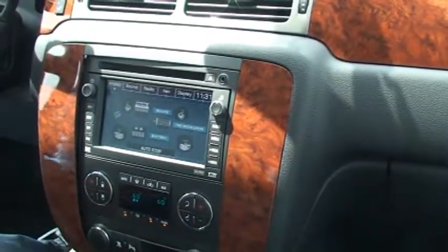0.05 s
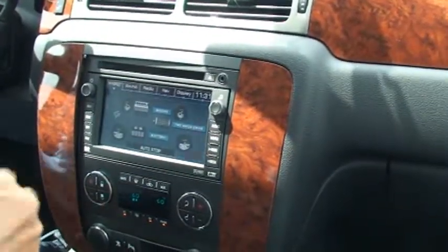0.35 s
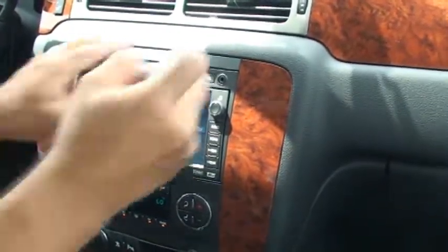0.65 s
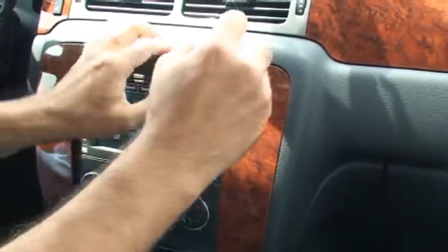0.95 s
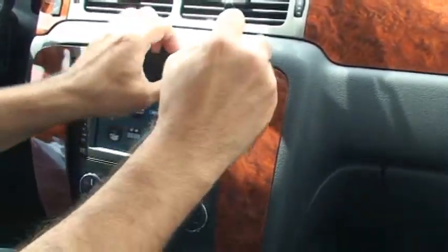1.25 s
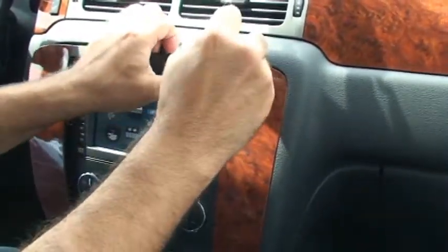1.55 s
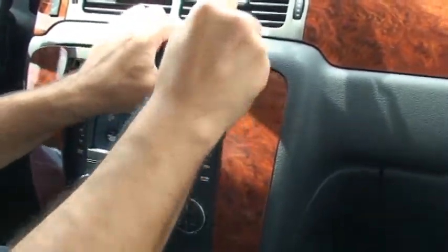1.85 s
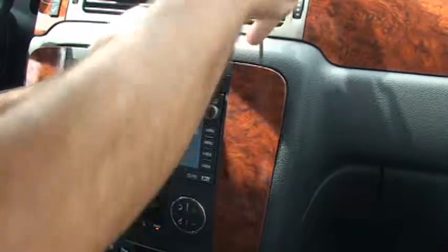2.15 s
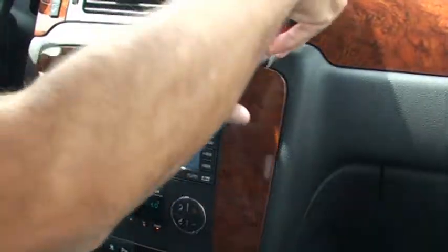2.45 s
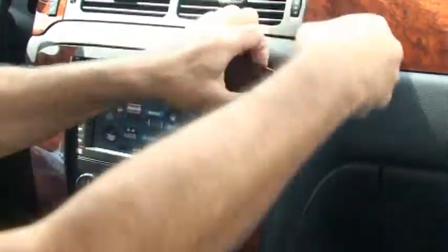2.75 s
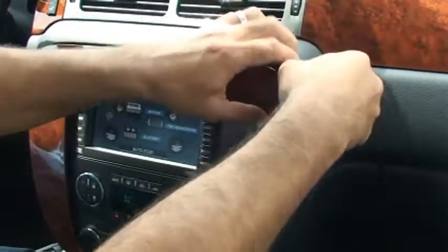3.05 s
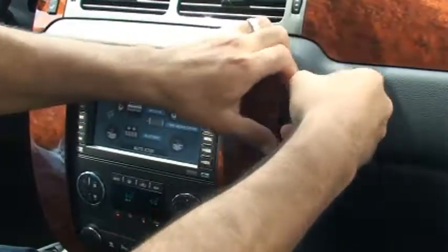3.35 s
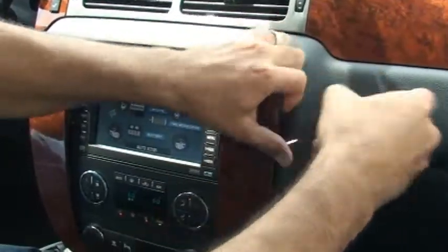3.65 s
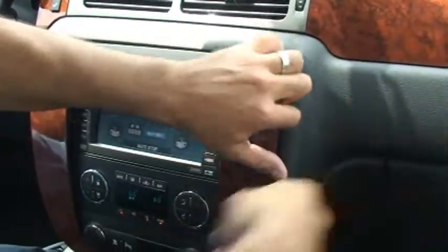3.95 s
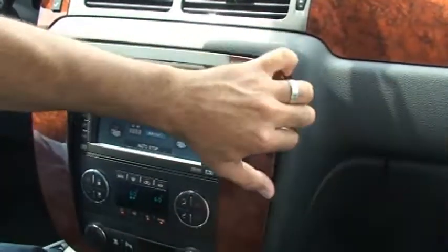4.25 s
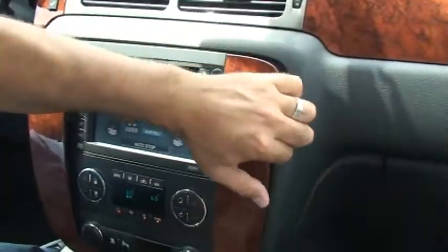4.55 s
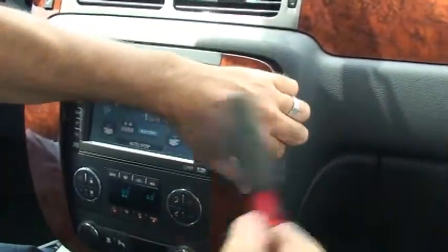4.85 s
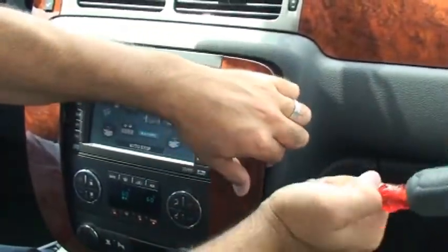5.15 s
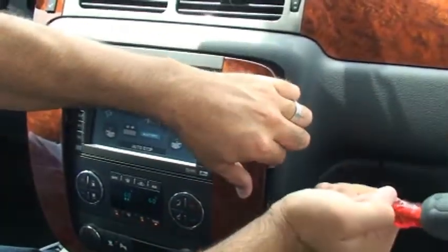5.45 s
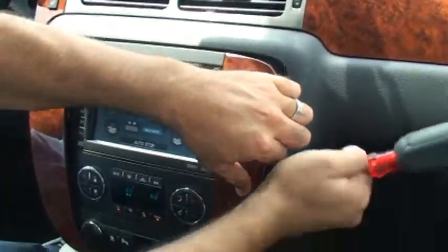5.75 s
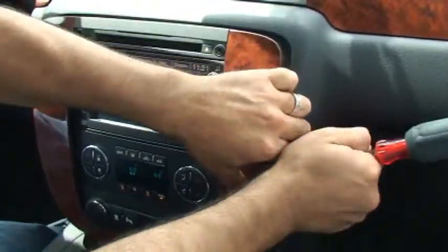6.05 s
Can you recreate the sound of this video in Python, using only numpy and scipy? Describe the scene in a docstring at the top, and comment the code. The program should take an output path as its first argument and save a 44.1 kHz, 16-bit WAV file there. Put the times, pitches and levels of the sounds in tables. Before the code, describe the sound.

Inside a small car cabin with little echo, air vents hum and hiss while a hand swishes over plastic trim. A screwdriver blade ticks in a gap and the first clips snap, knocking the dashboard frame. A flurry of snaps and hollow thumps follows, then the steel shaft slips free with a brief ring. A few more snaps give way to light ticks and rubbing, all heard close.

```python
"""A plastic dashboard frame is prised off with a screwdriver in a small car cabin with little echo.
From the start the vents hum and hiss, and a hand swishes over the trim. The blade ticks in the gap, the
plastic creaks and the steel tip pings. Just after 1 s the first fasteners snap: the frame knocks and
judders, and the hollow dashboard thumps. A flurry of snaps comes around 3 s, then the shaft slips free
and rings. More snaps follow near 4.6 s, and the scene ends mostly in light ticks and rubbing."""
import sys
import numpy as np
from scipy import signal
from scipy.fft import rfft, irfft, next_fast_len
from scipy.io import wavfile
from scipy.ndimage import map_coordinates

SR = 44100
rng = np.random.default_rng(int(sys.argv[2]) if len(sys.argv) > 2 else 0)


def dump_mix(stems):
    """Bounce the given channels to the path in sys.argv[1] as a 16-bit WAV at rate SR."""
    frames = np.atleast_2d(stems).T  # one column per channel
    limited = np.clip(frames, -1, 1)  # hard clip at full scale
    pcm = np.round(limited * 32767).astype(np.int16)
    wavfile.write(sys.argv[1], SR, pcm)


N = 277389
AGE = np.arange(SR // 6) / SR  # seconds since a blow

# Levels are relative. A t60 is the time a sound takes to fade by 60 dB.
# tone colours, from bass to treble (f/Hz, level/dB)
RUMBLE_TONE = [(12, -13), (26, 1.5), (33, -15), (46, -0.5), (62, -9), (82, -6.5), (112, 2), (132, -11),
               (180, -8), (250, -18.5), (340, -18.5), (600, -29.5), (1500, -90)]  # dashboard and cabin rumbling
VENT_TONE = [(150, -3), (250, -39), (450, -15.5), (800, -14), (1400, -13.5), (3000, -37), (6000, -24.5),
             (10000, -25.5), (15500, -32)]  # air leaving the vents
SKIN_TONE = [(1500, 7), (4000, 0.5), (7000, -1), (10000, -11), (13000, -8.5), (15500, -20)]  # skin on plastic
CREAK_TONE = [(150, -12), (300, 1.5), (450, -1), (800, 0), (1300, -9), (2000, -11), (5000, -20.5),
              (9000, -61)]  # strained plastic, also air in the ducts
RUB_TONE = [(1000, 10.5), (2000, 5), (3500, -6), (6300, -0.5), (10000, -11.5), (13000, -7), (15500, -35)]  # plastic rubbing, also the cabin's hiss
CRACK_TONE = [(1200, 16), (2300, 4.5), (3500, 4.5), (6300, -4), (9400, -16), (13000, -19.5), (15500, -45)]  # a contact breaking
# how alike a noise is on the left and right (f/Hz, likeness where 1 is the same)
EAR_LIKENESS = [(25, 1), (60, 0.89), (130, 0.9), (290, 0.05), (640, 0.019), (1400, 0.089), (3100, 0.36),
                (7000, 0.44), (13000, 0.79)]
# how much louder a noise is on the left (f/Hz, left minus right/dB)
EAR_BALANCE = [(30, -11), (60, 7), (110, -2.5), (200, -3.5), (700, -4.5), (1300, -2.5), (4400, 0)]
# the fan's steady notes (f/Hz, level/dB)
FAN_NOTES = [(99, -49.5), (231.5, -49), (274.5, -49.5), (317.6, -54.5)]
# a hand slides; a lighter glide sounds thinner (middle t/s, width/s, level/dB, extra treble/dB)
HAND_SLIDES = [(.01, 0.17, -46.5, 8.5), (0.428, 0.1, -47, 6.5), (.63, 0.023, -45.5, 7),
               (.84, 0.17, -48.5, 4), (1.115, .025, -44.5, 5), (1.35, 0.054, -48, 1),
               (1.6, 0.056, -53.5, -1), (1.96, .06, -62, 15), (2.22, 0.36, -52, -3),
               (2.53, 0.018, -41.5, 9), (2.72, .06, -48, 8), (3.29, 0.026, -42, 5), (3.52, 0.09, -47, -2),
               (4.15, 0.07, -49.5, 6), (4.9, 0.18, -56, 3), (5.245, 0.035, -46.5, 8.5),
               (5.33, 0.024, -47, 7.5), (5.99, 0.083, -47.5, 8), (6.2, 0.054, -45.5, 6)]
# the arms put weight on the dashboard (middle t/s, width/s, level/dB)
ARM_LEANS = [(.02, 0.11, -36.5), (1.03, 0.056, -32.5), (2.48, 0.092, -27.5), (3.33, 0.053, -31),
             (3.9, 0.23, -37), (4.68, 0.1, -35), (6.16, 0.16, -36.5)]
# the frame is levered and grinds in its seat (middle t/s, width/s, level/dB)
LEVER_STRAINS = [(.76, 0.067, -46), (.95, 0.097, -45.5), (1.3, 0.15, -43), (1.98, 0.076, -47),
                 (2.59, 0.057, -33.5), (2.8, 0.081, -38.5), (3.23, 0.078, -35.5), (3.68, 0.024, -26),
                 (4.05, 0.24, -49.5), (4.73, 0.15, -49), (5.93, 0.044, -40.5), (6.27, 0.053, -41)]
# light touches of the blade and fingernails (t/s, level/dB, f/Hz)
LIGHT_TOUCHES = [(0.243, -41, 9100), (0.722, -42, 2330), (0.805, -43.5, 2300), (0.9628, -24.5, 3510),
                 (1.135, -23.5, 12100), (1.3804, -37, 4930), (1.5593, -37.5, 5740), (1.6233, -35, 2690),
                 (1.6901, -39, 2110), (2.053, -35, 3100), (2.077, -35.5, 4900), (2.1958, -26, 7280),
                 (2.274, -36, 2620), (2.361, -14, 8950), (2.5055, -28, 2820), (3.658, -8.5, 6170),
                 (4.0947, -36, 3030), (4.7947, -30.5, 6100), (4.9886, -36.5, 6050), (5.5053, -40, 2740),
                 (5.543, -32.5, 2680), (5.5779, -25, 6580), (5.5917, -27.5, 4740), (5.621, -29.5, 4850),
                 (5.829, -33.5, 5250), (5.8969, -25, 5560), (5.9793, -28.5, 8800), (5.995, -32, 8900),
                 (6.013, -32, 7000), (6.123, -28, 6160), (6.1836, -34, 2450), (6.2317, -27, 3310),
                 (6.255, -28, 2700)]
# the steel tip glances off an edge (t/s, level/dB, f/Hz, t60/s)
TIP_GLANCES = [(.964, -29.5, 3700, 0.057), (4.797, -51, 6150, 0.088)]
# the notes within one ping (multiple of its pitch, level/dB)
PING_NOTES = [(1, 4.5), (0.87, -17), (1.3, -6)]
# fasteners and frame edges let go; hardness and push set the crack and thump against the knock
# (t/s, level/dB, knock f/Hz, hardness/dB, push/dB)
RELEASES = [(1.136, -16, 800, -12.5, -17), (1.275, -33, 795, -13, -16), (1.456, -16, 890, -18.5, -15),
            (2.362, -22.5, 770, -1, -3), (2.372, -16.5, 460, -10.5, -2), (2.811, -27.5, 810, -18.5, -28),
            (2.83, -20, 650, -12.5, -23), (2.839, -14.5, 980, -10.5, -11), (2.862, -13, 836, -8.5, -14.5),
            (2.882, -15.5, 375, -6, -12), (2.921, -17.5, 734, -12.5, -10), (2.936, -20, 380, -13.5, -11),
            (3.012, -17, 683, -9.5, -16), (3.029, -15, 710, -10.5, -28), (3.04, -15.5, 1190, -11.5, -15),
            (3.073, -15.5, 805, -12.5, -27), (3.087, -23.5, 810, -11, -8), (3.14, -17.5, 594, -16.5, -19),
            (3.157, -25, 1320, -6.5, -11), (3.189, -26.5, 446, -11.5, -1.5), (3.225, -28, 1430, -10, -16),
            (3.249, -31.5, 1720, -1.5, -3), (3.282, -32, 1800, -2, -20), (3.318, -30.5, 1090, -14.5, 3.5),
            (3.436, -21, 610, -4.5, -5.5), (3.558, -32.5, 600, -6, -3.5), (3.571, -30.5, 615, -6, 0.5),
            (3.626, -26, 1460, -3, -5.5), (3.658, -30.5, 790, 3, 0), (3.717, -19.5, 1000, -1, -3),
            (3.738, -24, 1590, 1, 0), (3.87, -20.5, 1100, -9, -35), (3.948, -24.5, 1120, -5, -21),
            (4.071, -34.5, 1430, -6, -19), (4.331, -36, 1440, 1.5, -4), (4.494, -28, 468, -9, 7.5),
            (4.614, -30.5, 503, -19.5, -8), (4.641, -17, 420, -9.5, 2.5), (4.666, -23, 680, -12, -3),
            (4.755, -24, 605, -15, -11), (4.764, -28, 650, -12, -15), (4.774, -29.5, 1540, -12, -24),
            (5.447, -28, 1400, -3, -12), (5.843, -27.5, 1080, -14, -21), (6.029, -27.5, 1450, -6, -4)]
# modes, the notes a part rings at when struck; wider ones die sooner (f/Hz, width/Hz, level/dB)
FRAME_MODES = [(385.4, 18.5, 9), (435, 20, 5.5), (512, 10, 1.5), (634.5, 31, 5.5), (710.4, 11, 6),
               (801, 40, 10.5), (974, 31, -0.5), (1095, 37, 6.5), (1254, 28, 6), (1388, 27, 7),
               (1466, 56, 7.5), (1690, 56, 4)]  # the plastic frame
DASHBOARD_MODES = [(83, 12, -7), (108.7, 14.3, -2.5), (158, 130, -11), (180.6, 30, -5), (237, 22, 0)]  # the hollow dashboard
SOCKET_MODES = [(2173, 16, 9.5), (2334, 43, 8.5), (2560, 32, 5.5), (2755, 20, 4.5), (3090, 73, -5.5),
                (3440, 29, -17), (3790, 18, 5)]  # the sockets that hold the fasteners
# the frame moves along its seat in quick slips (start t/s, length/s, level/dB, f/Hz)
SLIP_RUNS = [(1.148, .03, -27.5, 477), (1.199, .042, -36, 755), (2.556, .08, -40.5, 980),
             (3.018, .04, -28, 1060), (3.693, .025, -40.5, 880), (4.489, .006, -27.5, 540),
             (4.649, .008, -22, 450), (4.688, .014, -37.5, 495), (4.741, .028, -32.5, 580),
             (5.859, .05, -37, 710), (6.227, .052, -37.5, 1490)]
# the blade springs or is dragged out of the gap (t/s, level/dB, rise/s)
BLADE_EXITS = [(3.735, -40, .002), (3.777, -26, 0.019), (3.948, -31.5, 0.0017)]
# the notes of the screwdriver's shaft (f/Hz, level/dB, t60/s)
SHAFT_NOTES = [(2277, 2, 0.19), (3520, -11, 0.054), (4560, -12, 0.12)]


def amp(db):
    """Turn decibels into a number to multiply by."""
    return 10 ** (np.asarray(db) / 20)


def unit(x):
    """Scale a sound to an average strength (rms) of 1."""
    return x / np.sqrt(np.mean(x ** 2) + 1e-20)


def punch(x):
    """Scale a blow to an average strength of 1 over its first 30 ms."""
    return x / np.sqrt(np.mean(x[..., :round(.03 * SR)] ** 2) + 1e-20)


def along(points, hz):
    """Read between (f/Hz, value) points on a log frequency scale."""
    freqs, values = np.transpose(points)
    return np.interp(np.log(hz + 1), np.log(freqs + 1), values)


def sides(pan_db):
    """Left and right gains, with the left louder by pan_db."""
    gains = amp(np.array([pan_db, -pan_db]).reshape(2, -1) / 2)
    return gains / np.sqrt(np.mean(gains ** 2, axis=0))


def wobble(rate):
    """A smooth curve through `rate` random values a second."""
    return map_coordinates(rng.standard_normal(int(N * rate / SR) + 4), [np.arange(N) * rate / SR])


def fade(t60):
    """The dying away after a blow."""
    return np.exp(-np.log(1000) * AGE / t60)


def swells(rows):
    """The loudness of movements that speed up and slow down again."""
    t = np.arange(N) / SR
    return np.sqrt(sum(amp(db) ** 2 * np.exp(-((t - s) / width) ** 2) for s, width, db in rows))


def add(track, s, sound):
    """Mix a stereo sound in at s seconds."""
    start = round(s * SR)
    track[:, start:start + sound.shape[1]] += sound[:, :N - start]


def band(x, lo_hz, hi_hz, order=3):
    """Keep the part of a sound between two frequencies."""
    return signal.sosfilt(signal.butter(order, [lo_hz, hi_hz], 'band', fs=SR, output='sos'), x)


def colour(x, points, size=1024):
    """Shape a sound's tone to follow (f/Hz, level/dB) points."""
    gain = amp(along(points, np.fft.rfftfreq(size, 1 / SR)))
    cepstrum = irfft(np.log(gain + 1e-6))
    cepstrum[1:size // 2] *= 2  # folded forward, so nothing rings before the blow
    cepstrum[size // 2 + 1:] = 0
    response = irfft(np.exp(rfft(cepstrum)))
    return signal.fftconvolve(x, response[None], axes=1)[:, :x.shape[1]]


def rush(tone, grain_db=0, grain_rate=200):
    """Stereo noise with a given tone colour; uneven friction can make it grainy."""
    size = next_fast_len(N + SR // 4)
    hz = np.fft.rfftfreq(size, 1 / SR)
    spread = np.arccos(along(EAR_LIKENESS, hz)) / 2
    noise = rng.standard_normal((2, N)) * amp(grain_db * wobble(grain_rate))
    mid, side = rfft(noise, size) * amp(along(tone, hz)) * [np.cos(spread), np.sin(spread)]
    left_right = np.array([mid + side, mid - side]) * sides(along(EAR_BALANCE, hz))
    return unit(irfft(left_right, size)[:, :N])


def burst(t60, tail_db, tail_t60, width, spiky, attack_s=0.0015):
    """A contact breaks in a spray of tiny clicks; the cabin answers with a short tail."""
    common, size, left, right = rng.standard_normal((4, len(AGE)))
    apart = width * np.array([left, right])
    spray = unit(common * np.exp(spiky * np.clip(size, -2, 2))) + apart
    tail = amp(tail_db) * (rng.standard_normal(len(AGE)) + 2 * apart) * fade(tail_t60)
    return (spray * fade(t60) + tail) * (1 - np.exp(-AGE / attack_s))


def ring(modes, damping, detune, lag):
    """Modes ring at new strengths each blow; bending detunes them; left and right are out of step."""
    hz, width, db = np.transpose(modes)[:, :, None]
    shift, level, phase = rng.standard_normal((3, len(hz), 1))
    strength = rng.choice([-1, 1], hz.shape) * amp(db + 2 * level) * np.sqrt(width)
    decay = strength * np.exp(-np.pi * damping * width * AGE)
    angle = 2 * np.pi * hz * (1 + detune * shift) * AGE
    return np.array([np.sum(decay * np.sin(angle + way * lag * phase), axis=0) for way in (-1, 1)])


def strike_at(x, centre_hz, focus_db):
    """Where a part is struck decides which of its modes are strongest."""
    return colour(x, [(centre_hz / 1.34, -focus_db), (centre_hz, 0), (centre_hz * 1.43, -focus_db)])


def cabin(rumble_db=-37, duct_db=-48, hiss_db=-62):
    """The steady background: a low rumble, and air rushing along the plastic ducts."""
    rumble = amp(rumble_db) * rush(RUMBLE_TONE)
    return rumble + amp(duct_db) * rush(CREAK_TONE) + amp(hiss_db) * rush(RUB_TONE)


def fan(air_db=-55, flutter_db=1.86, drift_rad=0.47):
    """The fan hums a little unsteadily while air hisses from the vents."""
    t, hum = np.arange(N) / SR, np.zeros(N)
    for hz, db in FAN_NOTES:
        peak = amp(db + flutter_db * wobble(3.415)) * np.sqrt(2)
        hum += peak * np.sin(2 * np.pi * hz * t + drift_rad * wobble(2.78))
    return hum * sides(-9.5) + amp(air_db) * rush(VENT_TONE)


def hand_slides(treble_hz=7500):
    """Skin swishes softly over smooth plastic as the grip shifts."""
    swish = rush(SKIN_TONE, grain_db=0.5, grain_rate=270)
    treble = signal.sosfiltfilt(signal.butter(2, treble_hz, 'high', fs=SR, output='sos'), swish)
    low_gain = swells([(s, width, db) for s, width, db, _ in HAND_SLIDES])
    treble_gain = swells([(s, width, db + extra_db) for s, width, db, extra_db in HAND_SLIDES])
    return low_gain * (swish - treble) + treble_gain * treble


def leaning_and_levering(creak_db=1, rub_db=-1.5, shake_db=-3):
    """Levering makes the plastic creak and rub; that and the arms' weight make the dashboard rumble."""
    strain = swells(LEVER_STRAINS)
    creak = amp(creak_db) * rush(CREAK_TONE, grain_db=3, grain_rate=40)
    rub = amp(rub_db) * rush(RUB_TONE, grain_db=5.5, grain_rate=540)
    rumble = (swells(ARM_LEANS) + amp(shake_db) * strain) * rush(RUMBLE_TONE)
    return strain * (creak + rub) + rumble


def ticks(tip_db=-13, focus_db=2.5, knock_db_per_octave=21):
    """The blade or a nail makes a bright tick; the finer the touch, the less it moves the frame."""
    out = np.zeros((2, N))
    for s, db, hz in LIGHT_TOUCHES:
        spray = burst(t60=0.072, tail_db=-4, tail_t60=0.046, width=0.54, spiky=1)
        tip = punch(band(spray, 1100, 8700, order=2))
        tip += amp(-6) * small_part(hz / 1.3, hz * 1.4, width_hz=31, count=4)
        tip = punch(colour(tip, [(hz / 2, -2 * focus_db), (hz, 0), (hz * 2, -focus_db)]))
        knock_db = -3 - knock_db_per_octave * np.log2(hz / 2270)
        add(out, s, amp(db) * (amp(tip_db) * tip + amp(knock_db) * knock(1090) * sides(-4.5)))
    return out


def small_part(lo_hz, hi_hz, width_hz, count):
    """Each small part rings briefly at a few high notes of its own."""
    notes = lo_hz * (hi_hz / lo_hz) ** rng.random(count)
    return punch(ring([(hz, width_hz, 0) for hz in notes], damping=0.86, detune=0, lag=0.21))


def knock(centre_hz, top_hz=2600, modes_db=5):
    """The frame rings and clatters in its seat, muffled by the hand that holds it."""
    tone = amp(modes_db) * punch(ring(FRAME_MODES, damping=0.63, detune=0.0053, lag=0.82))
    spray = burst(t60=0.1, tail_db=-5, tail_t60=0.17, width=0.071, spiky=0.5)
    clatter = punch(band(spray, 207, 1640))
    grip = fade(t60=0.85 * (800 / centre_hz) ** 0.33)  # higher knocks die sooner
    struck = strike_at(grip * (tone + clatter), centre_hz, focus_db=7)
    low_hz = np.clip(0.41 * centre_hz, 200, 380)
    return punch(band(struck, low_hz, top_hz))


def pings():
    """The steel tip glances off an edge and rings at three nearby notes."""
    out = np.zeros((2, N))
    for s, db, hz, t60 in TIP_GLANCES:
        tone = sum(amp(db + level) * np.sin(2 * np.pi * ratio * hz * AGE) for ratio, level in PING_NOTES)
        add(out, s, tone * fade(t60) * sides(-1))
    return out


def snaps(socket_db=-5, splinter_growth=1.614):
    """A fastener lets go: it cracks, knocks the frame and pushes the dashboard. Harder is brighter."""
    out = np.zeros((2, N))
    for s, db, knock_hz, hardness_db, push_db in RELEASES:
        # a soft contact lasts longer, which leaves the high modes silent
        top_hz = np.clip(1500 * 2 ** ((hardness_db + 13.5) / 13), 1100, 3200)
        body = knock(knock_hz, top_hz) + amp(push_db - 1) * thump(push_db)
        socket = amp(socket_db) * punch(ring(SOCKET_MODES, damping=0.84, detune=0.0062, lag=0.77))
        edge = amp(hardness_db) * punch(crack(1700, 5000, t60=0.09, tail_db=-5, width_hz=32) + socket)
        splinter = crack(5000, 15800, t60=0.05, tail_db=-6, width_hz=34)  # the crack's highest part
        splinter = punch(colour(splinter, [(6000, 0), (13000, 6 + 0.83 * hardness_db)]))
        edge += amp(splinter_growth * hardness_db) * splinter
        add(out, s, amp(db) * (body * sides(-8.5) + edge * sides(-2)))
    return out


def thump(push_db, db_per_octave=18):
    """The hollow dashboard swings back; a heavier push moves more of it, so it sounds lower."""
    centre_hz = np.clip(107 * 2 ** (-push_db / db_per_octave), 90, 260)
    swing = ring(DASHBOARD_MODES, damping=0.64, detune=0.04, lag=0.85)
    return punch(band(strike_at(swing, centre_hz, focus_db=-1), 87, 1.6 * centre_hz, order=2))


def crack(lo_hz, hi_hz, t60, tail_db, width_hz):
    """The sharp edge of a snap: a spray of clicks and the ring of the fastener."""
    spray = burst(t60, tail_db, tail_t60=0.11, width=0.36, spiky=0.35)
    ringing = amp(-4) * small_part(lo_hz, hi_hz, width_hz, count=12)
    return punch(colour(punch(band(spray, lo_hz, hi_hz)) + ringing, CRACK_TONE))


def judders(slips_per_s=130, scatter=0.32, grit_db=-17):
    """Plastic sticks and slips at an uneven rate, each slip a small gritty knock."""
    out = np.zeros((2, N))
    for start, length, db, centre_hz in SLIP_RUNS:
        late, size = rng.standard_normal((2, 14))
        slips = [knock(centre_hz, top_hz=1.43 * centre_hz)
                 + amp(grit_db) * crack(1620, 9000, t60=0.054, tail_db=-32, width_hz=35)
                 for _ in range(4)]
        offsets = np.abs(np.arange(len(late)) + scatter * late) / slips_per_s
        for k, offset in enumerate(offsets):
            if offset < length:
                add(out, start + offset, amp(db + 2 * size[k]) * slips[k % len(slips)] * sides(-7))
    return out


def shaft_ring(waver_rad=0.67):
    """The screwdriver's steel shaft rings on when it slips free."""
    out, t = np.zeros((2, N)), np.arange(SR // 3) / SR
    for s, db, rise_s in BLADE_EXITS:
        tone = np.zeros(len(t))
        for hz, level, t60 in SHAFT_NOTES:
            angle = 2 * np.pi * hz * t + waver_rad * wobble(95)[:len(t)]
            tone += amp(db + level) * np.exp(-np.log(1000) * t / t60) * np.sin(angle)
        add(out, s, tone * (1 - np.exp(-t / rise_s)) * sides(-1.4))
    return out


def scene():
    """Add the sharp sounds, the handling and the steady background together."""
    sharp_sounds = snaps() + judders() + ticks() + pings() + shaft_ring()
    handling = hand_slides() + leaning_and_levering()
    return sharp_sounds + handling + cabin() + fan()


def record(dry):
    """Round off the loudest peaks and cut the very highest treble."""
    top_hz, slope_width_hz = 15700, 700
    rounded = dry / (1 + np.abs(dry) ** 6) ** (1 / 6)
    size = next_fast_len(N + SR // 4)
    passed = np.clip((top_hz - np.fft.rfftfreq(size, 1 / SR)) / slope_width_hz + .5, 0, 1)
    return irfft(rfft(rounded, size) * passed, size)[:, :N]


dry = scene()
out = record(dry)
dump_mix(out)
```